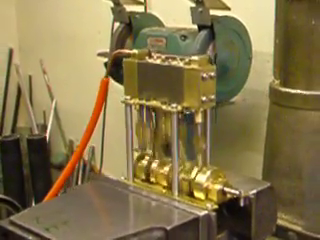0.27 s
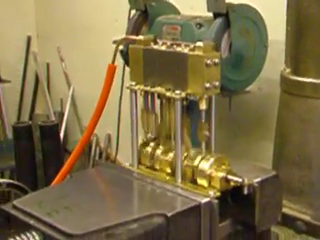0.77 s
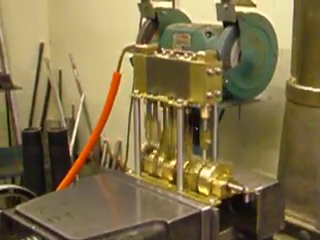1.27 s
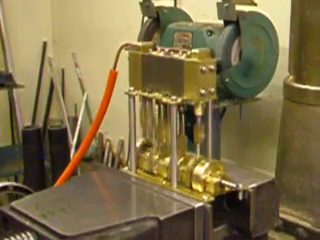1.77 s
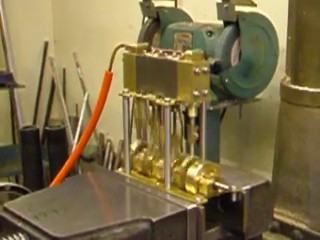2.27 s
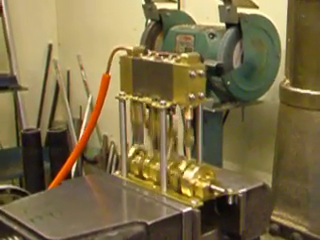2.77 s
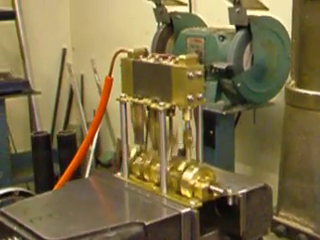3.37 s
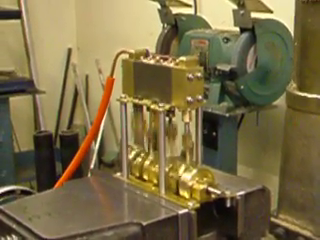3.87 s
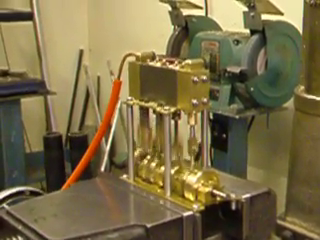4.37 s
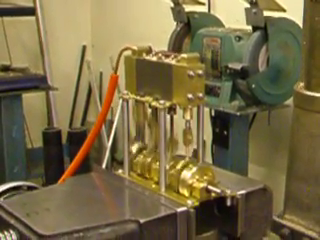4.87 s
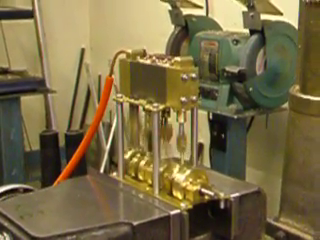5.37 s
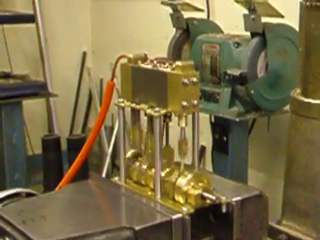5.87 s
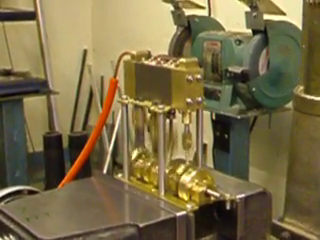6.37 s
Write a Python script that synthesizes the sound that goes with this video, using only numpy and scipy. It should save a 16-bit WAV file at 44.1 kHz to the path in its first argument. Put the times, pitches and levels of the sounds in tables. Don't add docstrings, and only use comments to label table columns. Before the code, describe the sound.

From 0 to about 6.6 seconds a small compressed-air piston engine runs without pause, already going at the start and still going at the end. The main sound is a bright, dense hiss of leaking air, strongest in the upper treble, fluttering about sixteen times a second as valves open and shut. Soft exhaust pops, four per turn, merge into a quick low purr with a slight hollow pipe ring. Around 0.8 to 1.3 seconds a shoe scuffs grittily on the floor, low and muted. The hiss is slightly stronger from 0.5 to 2.5, recedes around 3.4 to 4.6, then returns a little, peaking near 5.8 and dipping briefly near 6.1, its metallic colour changing as the microphone moves round. The beat quickens barely, towards seventeen turns a second. Beneath lie faint steel humming, fan rumble and mains hum in a small workshop with short echoes; the extreme treble is cut off.

```python
import sys
import numpy as np
from scipy import signal
from scipy.fft import rfft, irfft
from scipy.io import wavfile
from scipy.ndimage import uniform_filter1d

SR = 44100
rng = np.random.default_rng(int(sys.argv[2]) if len(sys.argv) > 2 else 0)


def put_to_file(sound):
    columns = np.atleast_2d(sound).T
    safe = np.clip(columns, -1, 1)
    whole_steps = np.round(safe * 32767)
    wavfile.write(sys.argv[1], SR, whole_steps.astype(np.int16))


def voltage_ratio(decibels):
    exponent = np.asarray(decibels, float) / 20
    return 10 ** exponent


N = 291059
T = np.arange(N) / SR

# (frequency [Hz], density [dB per Hz])
FAN_MURMUR = [(12, -29), (20, -10.5), (28, -15.5), (35, -17), (41, -13), (54, -29.5), (102, -17.5),
              (214, -12.5), (338, -18.5), (387, -31.5), (500, -31), (650, -51.5), (1100, -120)]
# (frequency [Hz], width [Hz], first-side level [dB], level once round [dB])
VICE_NOTES = [(724, 1.5, -71, -66), (1080, 1.5, -68, -66), (330, 30, -74, -68), (520, 6, -77, -76),
              (1199, 6, -75, -71), (2622, 14, -62, -53)]
# (frequency [Hz], width [Hz], level [dB])
SOLE_MODES = [(315, 95, 0), (830, 260, -1), (1100, 300, -6)]
# (crank angle [turns], low thud level [dB], pipe ring level [dB])
EXHAUST_POPS = [
    (.985, -56.5, -54),
    (.232, -60, -55),
    (.485, -57, -57),
    (.768, -58, -57),
]
# (time [s], speed [turns per s])
CRANK_SPEED = [(0, 16.052), (1.2, 16.256), (2, 16.297), (3.1, 16.563), (3.7, 16.435), (4.7, 16.737),
               (6.6, 16.777)]
# (crank angle [turns], spread [turns], frequency [Hz], spread [Hz], lift [dB])
VALVE_LEAKS = [(.02, .018, 3500, 2500, 3.7), (.065, .042, 5500, 1500, 4.2), (.11, .04, 1900, 800, 3.3),
               (.4, .06, 4500, 1500, -1), (.275, .025, 2500, 1800, 1.5), (.35, .08, 6450, 290, -2.5),
               (.44, .045, 7780, 500, 6), (.556, .023, 1400, 900, 2.5), (.6, .028, 7000, 2800, 3.3),
               (.72, .045, 4300, 3500, -2.6), (.819, .026, 2250, 680, 2.5), (.819, .03, 4130, 300, 5.5),
               (.83, .03, 5600, 700, 1.2), (.854, .015, 7590, 520, 3), (.902, .02, 6330, 300, 4.5),
               (.95, .03, 1800, 600, -3), (.965, .018, 5500, 3000, -2)]
# (frequency [Hz], density [dB per Hz])
AIR_JET = [(210, -44.5), (380, -19.5), (600, -20.5), (900, -23.5), (1400, -17), (1750, -14), (2300, -4.5),
           (3100, -4), (3900, -4.5), (4700, -3), (5600, -1.5), (6400, -0.13), (7100, -0.1), (7800, -1.3)]
# (frequency [Hz], width [Hz], first-side lift [dB], lift once round [dB])
BRASS_MODES = [(770, 99, 3.5, 0.5), (860, 413, 10, 9), (1020, 90, 2.5, 4.5), (1235, 48, 1.5, 3.5),
               (1604, 394, 6, 6), (1850, 162, 8, 9.5), (2090, 57, 5.5, 6.5), (2240, 62, 2, 3),
               (2485, 106, 6, 0), (2613, 45, -0.5, 8), (2750, 200, 7, 5.5), (2985, 37, 0.5, 4.5),
               (3160, 47, -1, 5), (3507, 283, 6, 7.5), (3720, 217, 4.5, 5), (4160, 330, 2, 4),
               (4350, 650, 4.5, 5.5), (4420, 34, -2, 0.5), (4977, 82, 12, 10), (5200, 150, 4.5, 8.5),
               (5400, 60, 1.5, 5.5), (5770, 230, 6, 0), (6010, 310, 3, 2.5), (6303, 220, 4, 6.5),
               (6460, 86, -2, 5.5), (6760, 460, 4, 3.5), (7030, 53, -5, -1), (7585, 410, 5.5, 3)]
# (time [s], hiss level [dB])
CAMERA_NEARNESS = [(0, -34.5), (.3, -34.5), (.45, -32.5), (1.1, -33), (1.65, -33.5), (1.9, -34),
                   (2.4, -33.5), (2.6, -34.5), (3.0, -35), (3.4, -36.5), (4.1, -36), (4.6, -36), (5.0, -35),
                   (5.5, -35), (5.82, -34), (6.1, -36.5), (6.6, -35)]
# (time [s], share [0-1])
CAMERA_ROUND = [(0, 0.3), (2.3, 0.4), (3.2, 0.8), (6.6, 0.98)]
# (frequency [Hz], gain [dB])
FILTER_EDGE = [(7000, 0.5), (7600, -1), (8000, -2), (8400, -12.5), (8800, -26.5), (9050, -42), (9200, -52),
               (9600, -90)]


def evened(x):
    return x / np.sqrt(np.mean(x ** 2) + 1e-20)


def read(points, hz):
    f, value = np.transpose(points)
    return np.interp(np.log(hz + 1), np.log(f + 1), value)


def bumps(peaks, hz):
    return sum(db / (1 + (2 * (hz - f) / width) ** 2) for f, width, db in peaks)


def coloured(x, db):
    log_gain = np.log(voltage_ratio(np.maximum(db, -100)))
    mirrored = np.r_[log_gain, log_gain[-2:0:-1]]
    phase = -signal.hilbert(mirrored).imag[:len(db)]
    impulse = irfft(np.exp(log_gain + 1j * phase))
    return signal.oaconvolve(x, impulse)[:N]


def ring(hz, t60):
    t = np.arange(8000) / SR
    return voltage_ratio(-60 * t / t60) * np.sin(2 * np.pi * hz * t) * (1 - np.exp(-t / 0.00032))


def way_round():
    return np.interp(T, *np.transpose(CAMERA_ROUND)).clip(0, 1)


def room(x, t60=0.24, wet_db=-9, count=10):
    at = np.arange(60, SR // 3, 22)
    wet = np.zeros(N)
    for k in range(count):
        taps = np.zeros(SR // 2)
        sign = rng.choice([-1., 1.], len(at))
        taps[at + rng.integers(0, 22, len(at))] = sign * voltage_ratio(-60 * at / SR / t60)
        here = np.cos(np.pi / 2 * np.clip(np.arange(N) / N * (count - 1) - k, -1, 1))
        wet += signal.oaconvolve(x * here, taps / np.linalg.norm(taps))[:N]
    return (x + voltage_ratio(wet_db) * wet) / np.sqrt(1 + voltage_ratio(2 * wet_db))


def shop(rumble_db=-65.5, hum_hz=59.6, hum_db=-78):
    rumble = coloured(rng.standard_normal(N), read(FAN_MURMUR, np.fft.rfftfreq(8192, 1 / SR)))
    hum = np.sin(2 * np.pi * hum_hz * T)
    return voltage_ratio(rumble_db) * evened(rumble) + voltage_ratio(hum_db + 3.5) * hum


def vice():
    out = np.zeros(N)
    for hz, width, first_db, round_db in VICE_NOTES:
        r = np.exp(-np.pi * width / SR)
        shake = signal.lfilter([1], [1, -r], rng.standard_normal(N) + 1j * rng.standard_normal(N))
        shake /= np.abs(shake) ** .6
        note = evened((shake * np.exp(2j * np.pi * hz * T)).real)
        out += voltage_ratio(first_db + (round_db - first_db) * way_round()) * note
    return out


def scuff(start_s=0.81, rise_s=0.14, hold_s=0.12, fall_db_per_s=49, level_db=-49):
    t = T - start_s
    fall = voltage_ratio(-fall_db_per_s * np.maximum(t - rise_s - hold_s, 0))
    shape = np.clip(t / rise_s, 0, 1) * fall
    hz = np.fft.rfftfreq(4096, 1 / SR)
    body = sum(voltage_ratio(2 * g) / (1 + (2 * (hz - f) / width) ** 2) ** 2 for f, width, g in SOLE_MODES)
    grit = rng.standard_normal(N) * voltage_ratio(3 * rng.standard_normal(N))
    return voltage_ratio(level_db) * shape * evened(coloured(grit, 10 * np.log10(body)))


def crank(t, start_turns=-.6):
    speed = np.interp(T, *np.transpose(CRANK_SPEED))
    return np.interp(t, T, start_turns + np.cumsum(speed) / SR)


def exhaust(uneven_db=2, jitter_turns=0.011, thud_db=-4, ring_db=0.):
    thuds, rings = np.zeros((2, N))
    luck = rng.standard_normal((110, len(EXHAUST_POPS), 3))
    turns = crank(T)
    for k, (at, low_db, pipe_db) in enumerate(EXHAUST_POPS):
        pop_turns = np.arange(110) - 1 + at + jitter_turns * luck[:, k, 0]
        when = np.interp(pop_turns, turns, T, left=-1, right=-1)
        heard = when >= 0
        place = (when[heard] * SR).astype(int).clip(0, N - 1)
        thuds[place] = voltage_ratio(thud_db + low_db + uneven_db * luck[heard, k, 1])
        rings[place] = voltage_ratio(ring_db + pipe_db + uneven_db * luck[heard, k, 2])
    base = -ring(190, .045) - .8 * ring(258, .06) - .25 * ring(125, .05)
    pipe = ring(760, .025) + .5 * ring(520, .03) + .4 * ring(1070, .04)
    return (signal.oaconvolve(thuds, base) + signal.oaconvolve(rings, pipe))[:N]


def valve_beat(hz, t, depth=1.0, uneven=.35):
    turns = crank(t)
    luck = 1 + uneven * np.tanh(rng.standard_normal((130, len(VALVE_LEAKS))))
    beat = np.zeros((len(hz), len(t)))
    for k, (at, spread, f, wide, db) in enumerate(VALVE_LEAKS):
        which = np.round(turns - at)
        gate = np.exp(-.5 * ((turns - at - which) / spread) ** 2) * luck[which.astype(int) + 3, k]
        beat += depth * db * np.exp(-.5 * ((hz - f) / wide) ** 2)[:, None] * gate
    return beat


def camera_tilt(hz, t, chance, sway_db=0.42):
    s, level = np.transpose(CAMERA_NEARNESS)
    near = np.interp(t, s, level - level.mean())
    gone = np.interp(t, T, way_round())
    sway = [sway_db * evened(uniform_filter1d(uniform_filter1d(c, size=200), size=200)) for c in chance]
    low = 0.2 * gone + .1 * near + sway[0]
    top = 0.25 * gone - .2 * near + sway[1]
    low_share = np.clip((3200 - hz) / 800, 0, 1)[:, None]
    top_share = np.clip((hz - 5300) / 800, 0, 1)[:, None]
    return low_share * low + top_share * top


def leaks(flicker_db=0.01, patchy_db=0.48, spit_db=2.):
    hiss = rng.standard_normal(N) * voltage_ratio(spit_db * rng.standard_normal(N))
    hz, t, z = signal.stft(hiss, SR, nperseg=128, noverlap=96)
    field = valve_beat(hz, t)
    chance = rng.standard_normal((len(t), len(hz))).T
    field += flicker_db * evened(uniform_filter1d(chance[0], 6))
    field += patchy_db * evened(uniform_filter1d(uniform_filter1d(chance, 30, 1), 2, 0))
    field += camera_tilt(hz, t, chance[1:3])
    air = signal.istft(z * voltage_ratio(field), SR, nperseg=128, noverlap=96)[1][:N]

    fine = np.fft.rfftfreq(8192, 1 / SR)
    jet = read(AIR_JET + [(8100, -2), (8600, -60)], fine)
    f, width, *sides = np.transpose(BRASS_MODES)
    first, second = (evened(coloured(air, jet + bumps(zip(f, width, db), fine))) for db in sides)
    way = way_round()
    level_db = 4.0 + np.interp(T, *np.transpose(CAMERA_NEARNESS))
    return voltage_ratio(level_db) * ((1 - way) * first + way * second)


def scene():
    in_room = room(leaks() + scuff())
    return (in_room + exhaust() + vice() + shop())[None]


def roll_off(x):
    return signal.sosfilt(signal.butter(12, 9140, fs=SR, output="sos"), x)


def record(dry, fold_hz=8000, offset=.0034):
    z, hz = rfft(dry), np.fft.rfftfreq(N, 1 / SR)
    mirror = np.round(2 * fold_hz * N / SR).astype(int) - np.arange(len(hz))
    z = np.where(hz < fold_hz, z, np.conj(z[:, mirror.clip(0)]))
    mix = irfft(z * voltage_ratio(read(FILTER_EDGE, hz)), N) + offset
    return roll_off(mix)


dry = scene()
out = record(dry)
put_to_file(out)
```